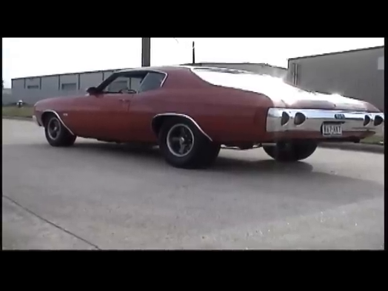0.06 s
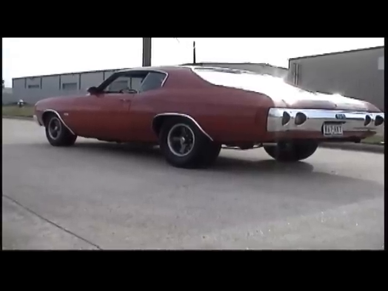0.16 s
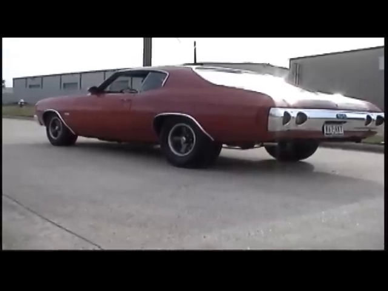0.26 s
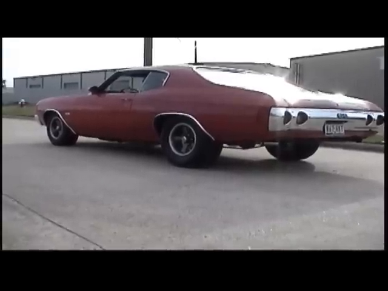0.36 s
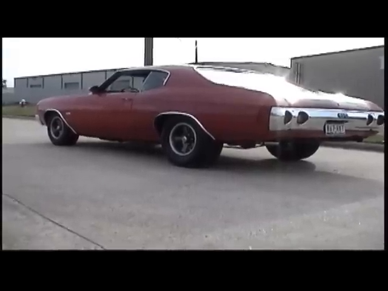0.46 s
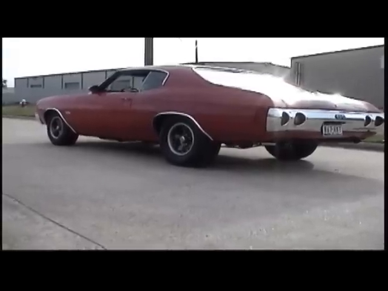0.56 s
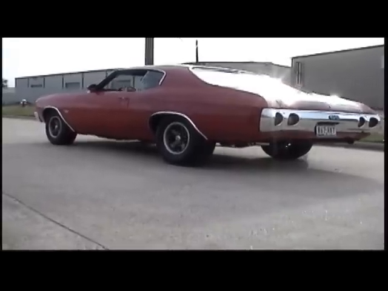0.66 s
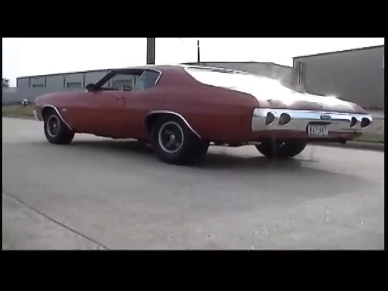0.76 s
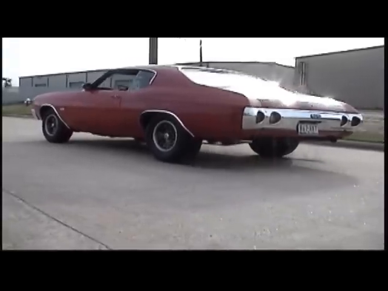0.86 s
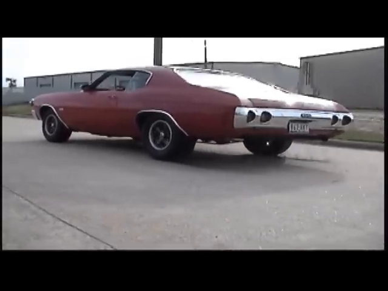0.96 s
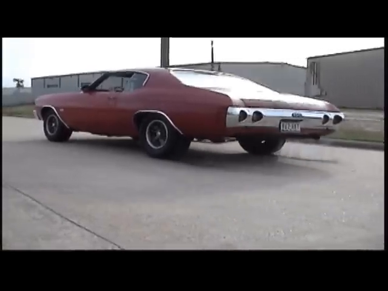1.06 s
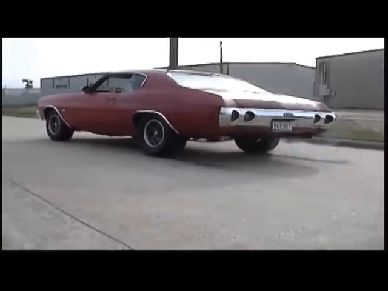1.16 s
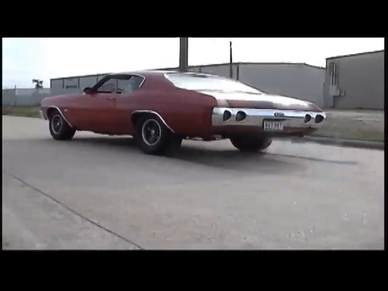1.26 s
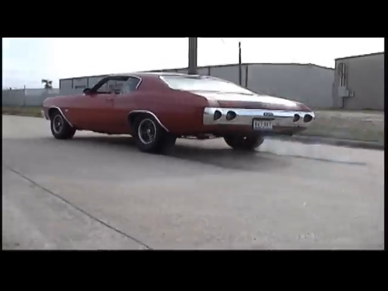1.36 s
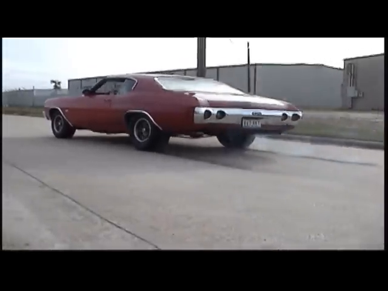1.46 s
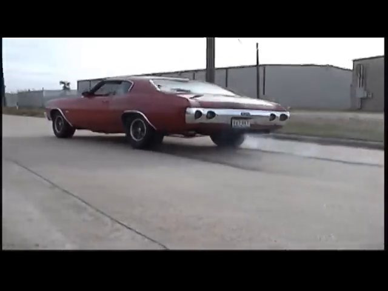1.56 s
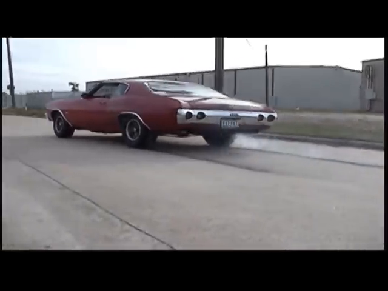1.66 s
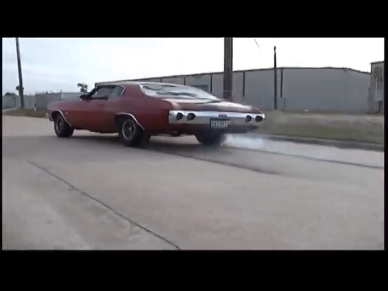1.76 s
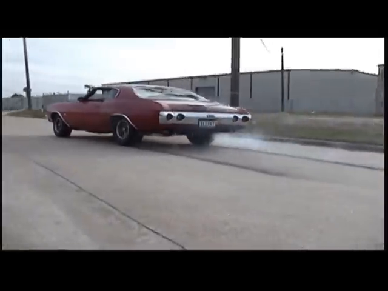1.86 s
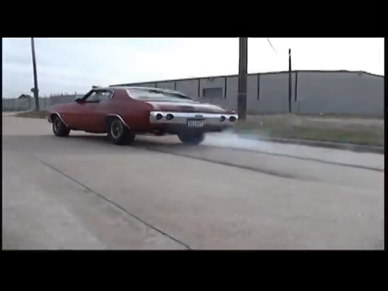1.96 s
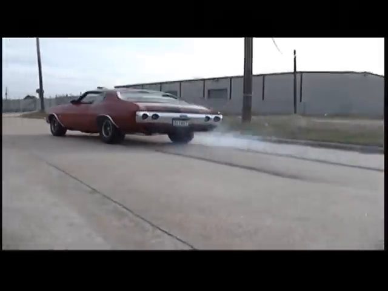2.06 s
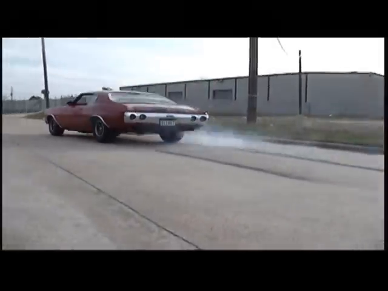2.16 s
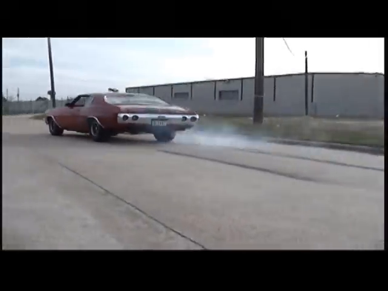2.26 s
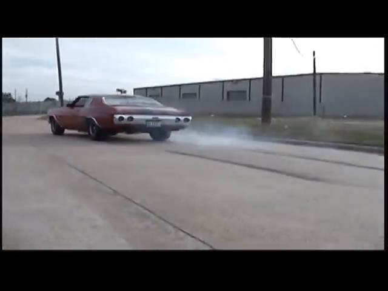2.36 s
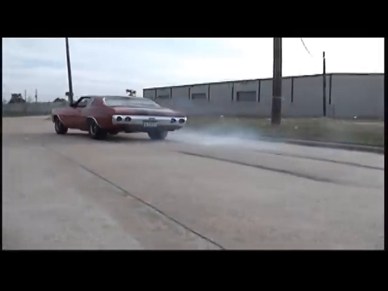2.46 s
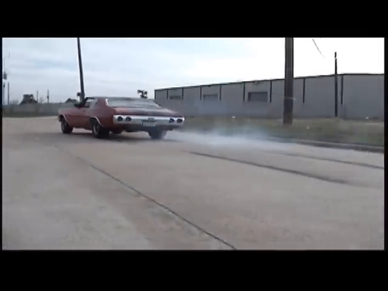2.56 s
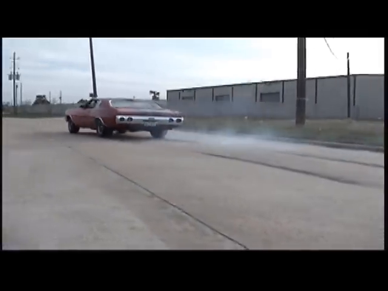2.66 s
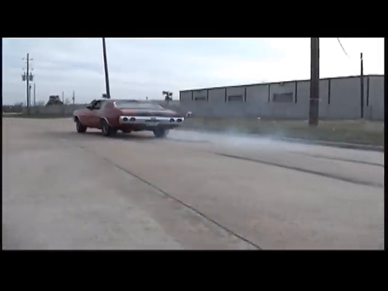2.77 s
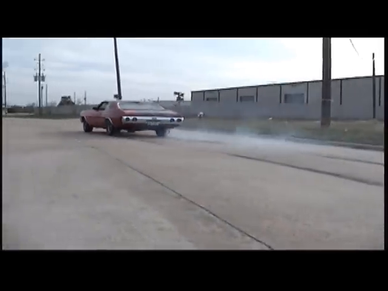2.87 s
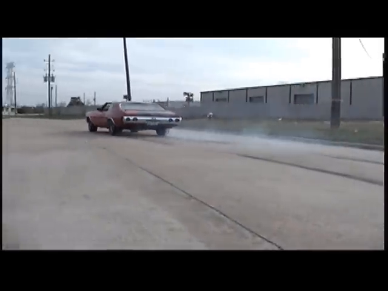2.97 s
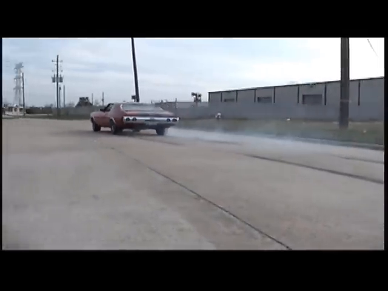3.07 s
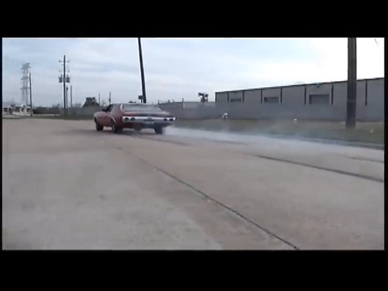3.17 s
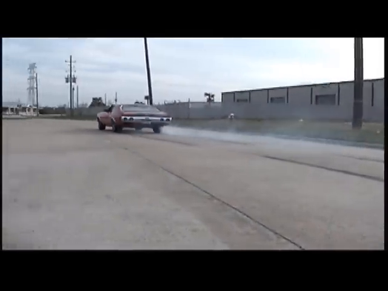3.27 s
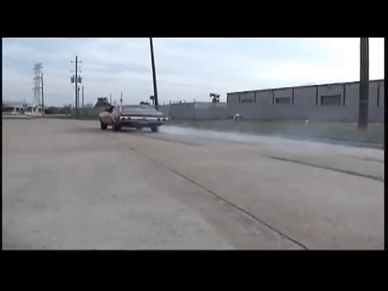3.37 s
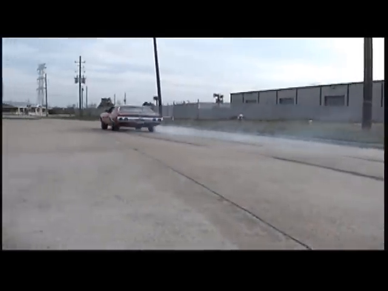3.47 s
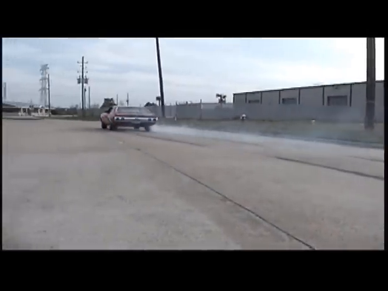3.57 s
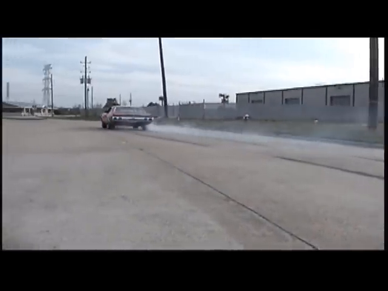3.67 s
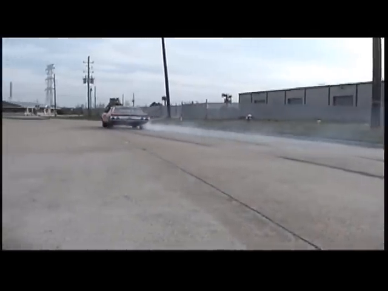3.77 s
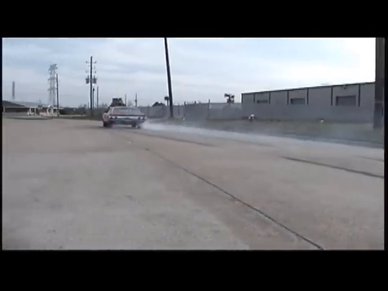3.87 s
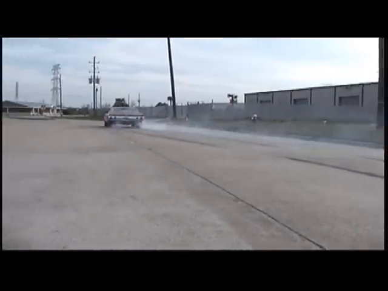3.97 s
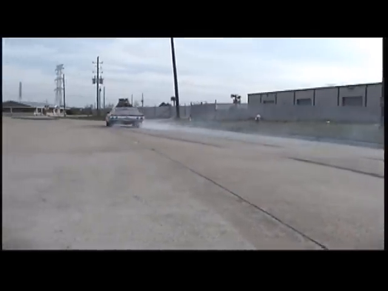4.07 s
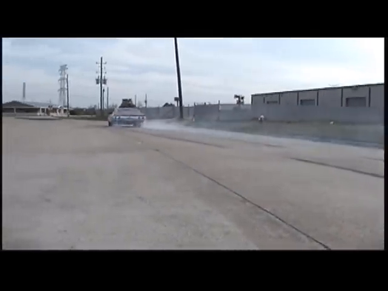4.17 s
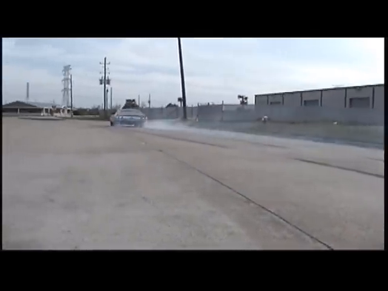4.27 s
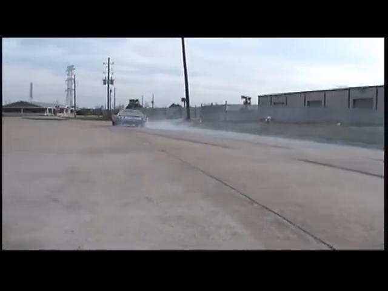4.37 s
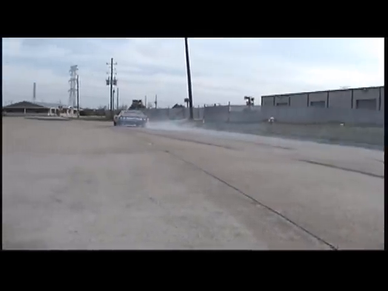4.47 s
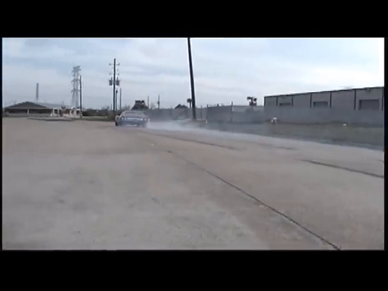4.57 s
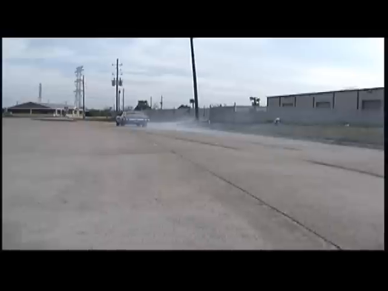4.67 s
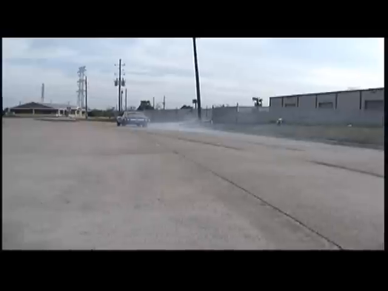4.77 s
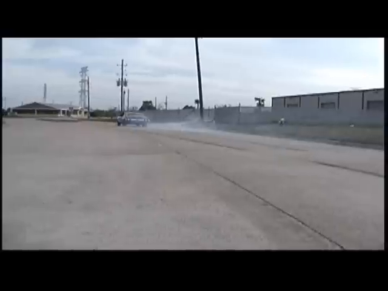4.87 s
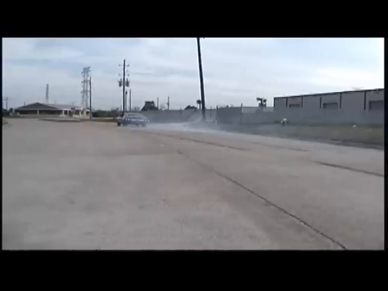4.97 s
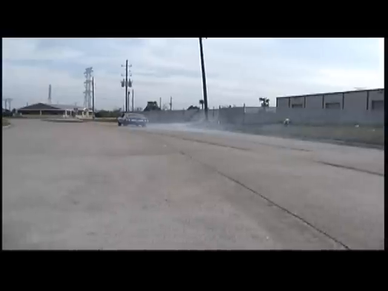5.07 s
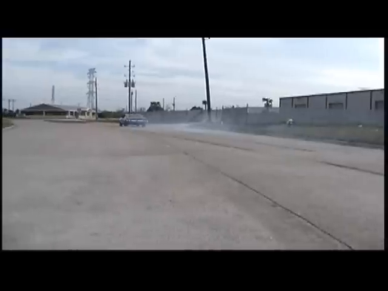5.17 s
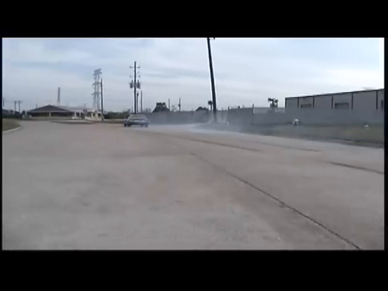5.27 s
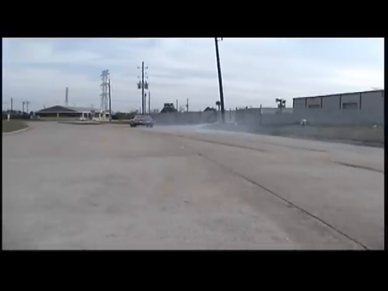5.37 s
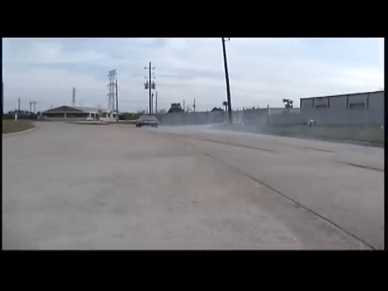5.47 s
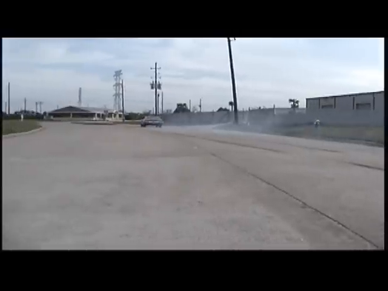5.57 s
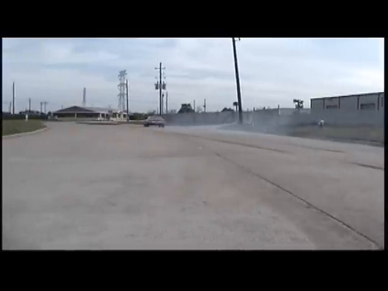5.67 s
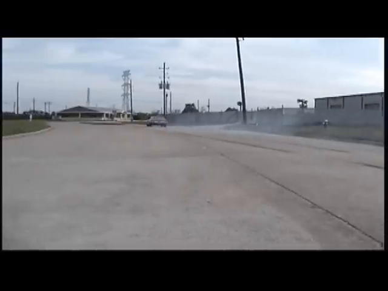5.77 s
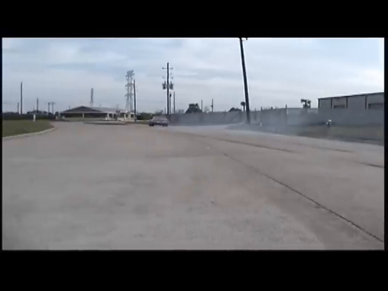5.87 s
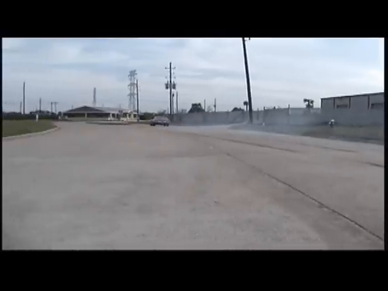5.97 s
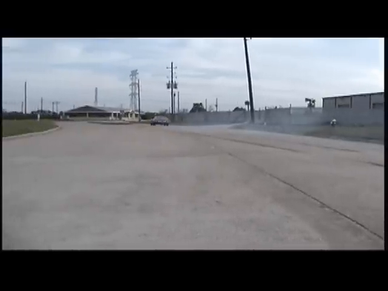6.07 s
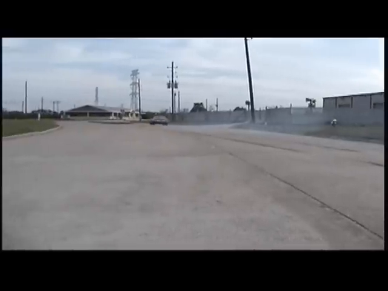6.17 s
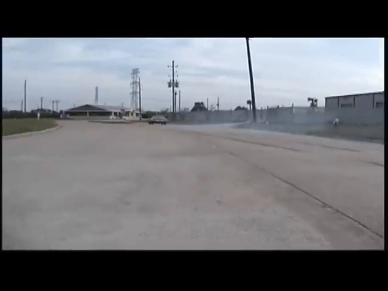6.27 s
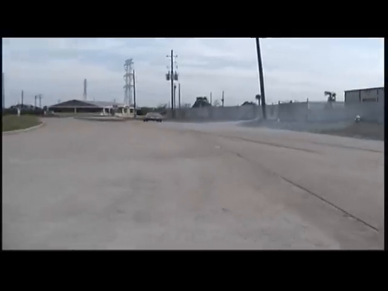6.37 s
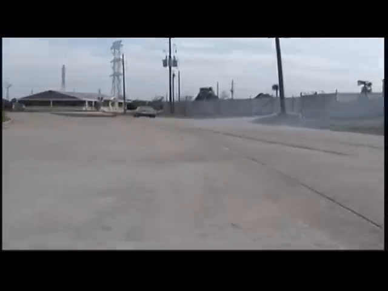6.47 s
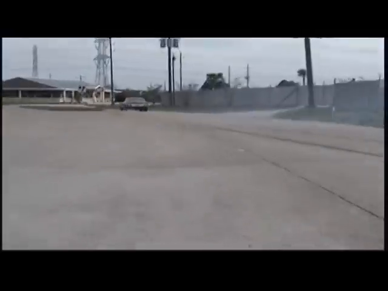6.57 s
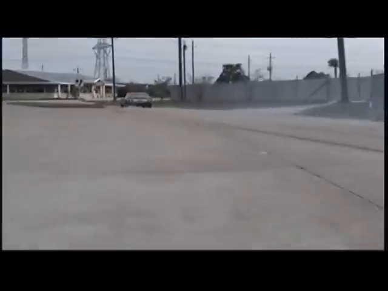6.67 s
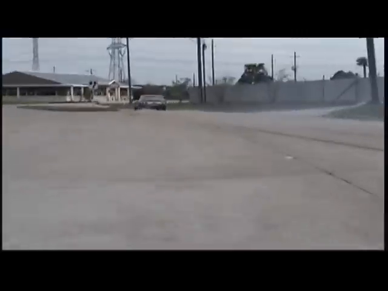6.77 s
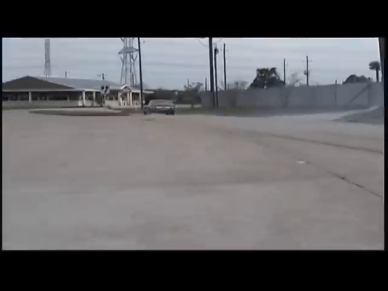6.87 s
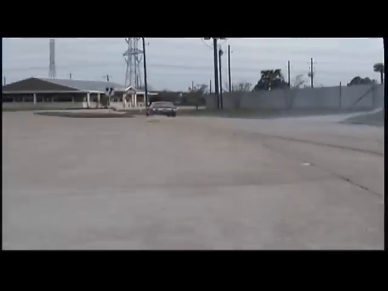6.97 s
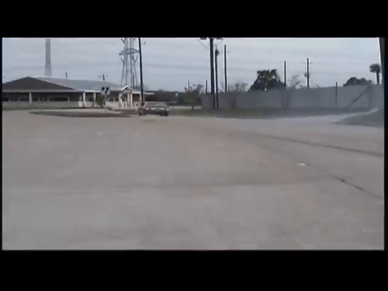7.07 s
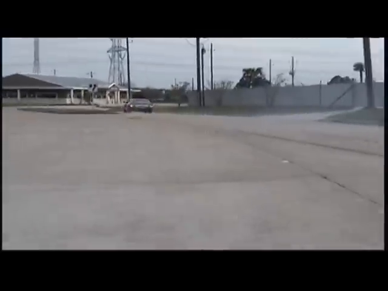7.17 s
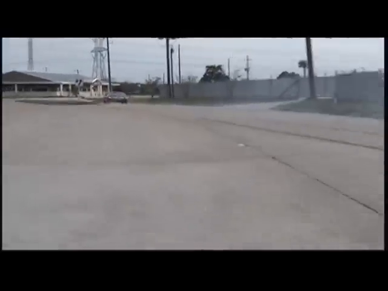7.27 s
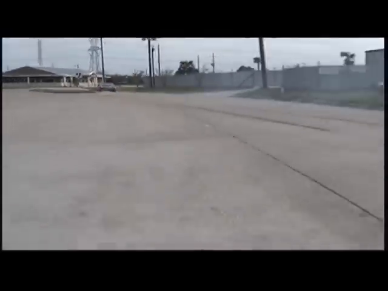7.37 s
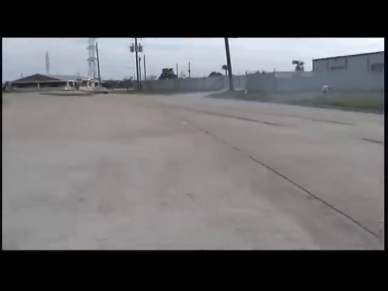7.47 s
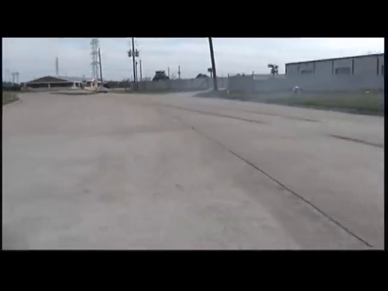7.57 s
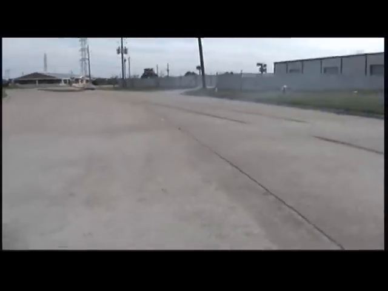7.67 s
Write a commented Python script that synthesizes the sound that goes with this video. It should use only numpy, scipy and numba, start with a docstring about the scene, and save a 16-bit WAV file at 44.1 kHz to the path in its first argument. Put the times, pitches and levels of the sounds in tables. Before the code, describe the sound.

Outdoors on a concrete lot, a V8 burbles and pops right beside a handheld camcorder. It roars, the rear tyres break into a wavering squeal, and revs climb. Two quick gear shifts each briefly stop the squeal before it resumes. The car recedes, duller and quieter, with faint echoes from metal sheds; wind buffets the microphone at the end.

```python
"""A V8 burbles and barks close by, then its rear tyres squeal through three gears as it drives off.
Eight firings a cycle excite the resonances of two exhaust pipes; puffs of noise give gas hiss, and
flickering narrow noise gives rasp. Both tyres stick and slip, a wavering tone with overtones over scrub
noise; sheds echo the car. Wind and a low rumble are coloured noise; a tape camcorder adds head-drum whine,
hiss and casing taps, and its input overloads at the loudest moments."""
import sys
import numpy as np
from scipy import signal
from scipy.fft import rfft, irfft, next_fast_len
from scipy.io import wavfile
from scipy.ndimage import uniform_filter1d
from numba import njit

SR = 44100
rng = np.random.default_rng(int(sys.argv[2]) if len(sys.argv) > 2 else 0)


def wav_out(sig):
    """Save sig, one row per channel (or a flat mono array), as 16-bit PCM at SR to the path in sys.argv[1]."""
    wavfile.write(sys.argv[1], SR, np.round(np.clip(np.atleast_2d(sig).T, -1, 1) * 32767).astype(np.int16))


N = 340222
TIME_S = np.arange(N) / SR


def undb(db):
    """Amplitude gain is ten to the power of the level in dB over 20."""
    return 10 ** (np.asarray(db) / 20)


def unit(x):
    """Normalisation: a signal divided by its root mean square has rms 1."""
    return x / np.sqrt(np.mean(x ** 2))


def curves(table):
    """Linear interpolation turns each column after t/s into a curve, sample by sample."""
    s, *columns = np.transpose(table)
    return [np.interp(TIME_S, s, column) for column in columns]


def geared(tables, fade_s=0.014):
    """Piecewise curves: tables joined in time, and a gate that is open while one of them runs."""
    gate = 0
    for table in tables:
        start_s, end_s = table[0][0], table[-1][0]
        gate = gate + np.clip(np.minimum(TIME_S - start_s, end_s - TIME_S) / fade_s, 0, 1)
    return curves(np.vstack(tables)) + [gate]


def colour(points):
    """Spectral shaping: white noise weighted along (f/Hz, density level/dB) points, scaled to rms 1."""
    hz, db = np.transpose(points)
    size = next_fast_len(N)
    bin_hz = np.arange(1, size // 2 + 2) * SR / size
    gain = undb(np.interp(np.log(bin_hz), np.log(hz), db))
    return unit(irfft(rfft(rng.standard_normal(size)) * gain, size)[:N])


def walk(rate):
    """Low-rate random modulation: levels held for 1 / rate s and slewed twice; rms 1."""
    hold = max(int(SR / rate), 1)
    steps = np.repeat(rng.standard_normal(N // hold + 1), hold)
    return unit(uniform_filter1d(uniform_filter1d(steps, hold), hold)[:N])


@njit
def svf(x, hz, width):
    """State-variable filter: two integrators in a loop, with a moving centre; band and low outputs."""
    band, low = np.empty(len(x)), np.empty(len(x))
    band_state, low_state = 0., 0.
    for i in range(len(x)):
        g = np.tan(np.pi * hz[i] / SR)
        damping = width[i] / hz[i]
        v = (band_state + g * (x[i] - low_state)) / (1 + g * (g + damping))
        band[i] = damping * v
        low[i] = low_state + g * v
        band_state = 2 * v - band_state
        low_state = low_state + 2 * g * v
    return band, low


def ring(x, hz, width_hz):
    """Resonance: a damped mode of fixed frequency passes the band around it."""
    return svf(x, np.full(N, 1. * hz), np.full(N, 1. * width_hz))[0]


def steady(x):
    """Gain control: the level is held at rms 1 over a fifth of a second."""
    return x / np.sqrt(uniform_filter1d(x ** 2, size=8192) + 1e-12)


def engine(cycle_hz, gas_db, rasp_db, boom_db, rough):
    """Source and resonator: each firing kicks the pipe of its bank and lets out a puff of gas."""
    # in firing order: bank, level/dB, lag through its branch of the manifold/s
    cylinders = [(0, 0, 0), (1, -.5, .0006), (1, -4, -.0004), (0, -5, .0008), (1, -9, 0), (0, -9, -.0006),
                 (0, -3, .0004), (1, -1.5, -.0008)]
    bank_lag_s, bank_db = .0007, -5  # the far pipe is heard later and softer
    # share of the unevenness between cylinders, even while held on the brake, lumpy under load: t/s, share
    lump_share = [(0, 0.66), (.45, 0.65), (.6, 0.95), (4.5, 0.9), (5.4, 0.9), (7.71, 1.1)]
    # modes of the pipe: f/Hz, width/Hz, level/dB
    pipe_modes = [(99, 21, -24.5), (150, 32, 4), (263, 36, 2), (307, 37, 4), (398, 28, 4), (538, 58, 1),
                  (627, 13.3, 2), (860, 320, -18.5)]
    # its colour shifts with load and as the car turns away: t/s, then change of level/dB of each mode
    pipe_colour = [(0, -3, 0, 17, -5, 6, 9, -6, -16), (.12, -6, 0, 18, 6, 11, 11, 9, -12),
                   (.25, 3, 0, 18.5, 20, 9, 6, 8, -12), (.4, -8, 0, 15, 4, 19, -7, 9, -10),
                   (.5, -7, 0, 8, -6, 5.5, 1, 6, -4), (1, 12, 0, 0, -2, -0.5, 2, -7, 10),
                   (1.9, 2, 0, -25, -4.5, -7, -0.5, -1, 5), (1.95, 5, 0.00095, 3, -1, 6, -5, -2, 4),
                   (2.05, 24, 0.0011, 8, 10, 5, 9, 12, 7), (2.35, 10, 0.007, -14, 0, -8, -11, 5, 10),
                   (2.6, 4, 0.00068, 0.5, -11, 0, -8.5, 0, 1), (3.1, 2, 0, 0.5, -5, -5, -2, -2, -1),
                   (3.5, -3, 0.0047, 1.5, 8.5, -5, 10, 6, -5), (4.05, 4, 0, -4, 2, -19, 5, -2, 2),
                   (4.12, 13, 0.011, -3.5, 0, -8, -5, 5, -6), (4.4, 18, 0, 5.5, -2.5, -4.5, -2, 3.5, -4),
                   (4.6, 5, 0.0000063, -2, -2.5, 1, 4, -7, -3), (5.5, -5, 0.0062, -5, 0, -10, -8, 0, -4),
                   (6.6, 12.5, 0, 12, 12, 4, 13.5, 5, -7)]
    # a mode near 206 Hz thrums at the start and again from 4.7 s: t/s, level re the pipe modes/dB
    thrum_level, thrum_hz, thrum_width_hz = [(0, -11), (2, -23.5), (4.3, -22), (4.7, -8.5), (5.5, -11.5),
                                             (6.6, -5)], 206.3, 33
    # a low mode near 105 Hz drones when the throttle shuts: t/s, level re the pipe modes/dB
    drone_level, drone_hz, drone_width_hz = [(0, -21), (1.92, -22), (2, -5.5), (2.3, -8), (2.45, -23),
                                             (3.4, -20), (4.05, -11.5), (4.15, -3.5), (4.4, -9), (4.6, -16),
                                             (6.6, -25)], 105, 31
    # noise spectra of the rough firings and of the hissing gas: f/Hz, density level/dB
    rumble_spectrum, gas_spectrum = [(40, -42), (130, -10.5), (600, 10.5), (1000, -23), (2000, -35)], [(500, -28), (1000, 1.5), (1600, -3.5), (2300, -3),
                                                     (3500, -14), (7000, -19), (11000, -16), (15500, -38)]
    rasp_hz = 2300

    count = .99 + 8 * np.cumsum(cycle_hz) / SR
    firing = count.astype(int)
    at = np.flatnonzero(np.diff(firing)) + 1
    bank, db, branch_s = np.transpose(cylinders)[:, firing % 8]
    late_chance, size_chance = rng.standard_normal((N // 64, 2))[:len(at)].T
    # the two banks fire unevenly, which gives the burble below the firing rate
    lump = np.clip(curves(lump_share)[0][at], 0, 1)
    late_s = lump * (bank[at] * bank_lag_s + branch_s[at]) + .001 * rough[at] * late_chance
    size = undb(lump * (db[at] + bank_db * bank[at]) + 6 * rough[at] * size_chance)
    kicks = np.zeros(N)
    np.add.at(kicks, np.clip(at + (late_s * SR).astype(int), 0, N - 1), size)
    # the valve opens gradually, so each kick is a soft push
    kicks = signal.sosfilt(signal.butter(4, 1100, fs=SR, output="sos"), kicks)

    def single_mode(hz, width_hz):
        """Two equal resonances in cascade select one mode narrowly."""
        return steady(ring(ring(kicks, hz, width_hz), hz, width_hz))

    modes = 0
    for (hz, width_hz, mode_db), shift_db in zip(pipe_modes, curves(pipe_colour)):
        modes = modes + undb(mode_db + shift_db) * ring(kicks, hz, width_hz)
    pipe = steady(modes)
    pipe = pipe + undb(boom_db) * single_mode(165.0, 40)
    pipe = pipe + undb(curves(thrum_level)[0]) * single_mode(thrum_hz, thrum_width_hz)
    pipe = pipe + undb(curves(drone_level)[0]) * single_mode(drone_hz, drone_width_hz)

    # each puff dies away in 4 ms over a constant flow
    puff = unit(signal.lfilter([1], [1, -np.exp(-1 / (.004 * SR))], kicks) + 2.5)
    gas = puff * (1.1 * rough * colour(rumble_spectrum) + undb(gas_db) * colour(gas_spectrum))
    flicker = undb(3.7 * walk(62))
    rasp = unit(flicker * ring(ring(rng.standard_normal(N), rasp_hz, 170), rasp_hz, 300))
    return np.sqrt(1 - rough ** 2) * pipe + gas + undb(rasp_db) * rasp


def air():
    """Turbulence: wind buffets the ports and rushes brighter as it grows, beside a low rumble."""
    # wind presses the two ports of the microphone in opposite senses: t/s, level/dB
    wind_level = [(0, -40), (.1, -34), (.22, -42), (.3, -69), (3.3, -63), (3.7, -53), (4.15, -41),
                  (4.3, -63), (4.6, -56), (4.85, -40.5), (5.15, -36), (5.4, -35.5), (5.5, -41),
                  (6.05, -44.5), (6.3, -41), (6.42, -39.5), (6.53, -46), (6.66, -32.5), (6.72, -44),
                  (6.79, -35.5), (6.84, -44), (6.88, -38.5), (7.05, -36.5), (7.15, -34.5), (7.3, -34.5),
                  (7.45, -31), (7.52, -35.5), (7.6, -34.5), (7.65, -41), (7.71, -37)]
    # spectra of buffet and rush: f/Hz, density level/dB
    buffet_spectrum, rush_spectrum = [(25, 2.5), (110, 2), (250, 1), (350, -11.5), (600, -20.5),
                                      (1500, -53)], [(200, -9.5), (350, 2), (600, -10.5), (1840, -34),
                                                      (3440, -46), (8000, -67)]
    # rush re buffet at gust level, its extra dB per dB of wind, and that gust level
    rush_at_gust_db, rush_growth, gust_db = -2.5, 1, -35.5
    shared_db = -13.5  # the part of the wind alike at both ports
    # a steady rumble, then gusts felt alike at both ports once the car has gone:
    # t/s, level before rumble_gain_db is added/dB
    gust_level, rumble_gain_db = [(6.72, -64), (7.028, -58), (7.038, -51), (7.052, -58), (7.11, -63),
                                  (7.14, -51.5), (7.23, -60), (7.312, -55), (7.444, -51.5), (7.566, -57),
                                  (7.594, -54), (7.638, -59), (7.686, -61), (7.71, -56)], 12
    # f/Hz, density level/dB
    rumble_spectrum = [(12, -7), (25, 2), (90, 3), (245, 10.5), (534, -0.5), (789, -5.5), (1460, -12),
                       (2500, -29.5), (3450, -40.5), (15500, -72.5)]

    db = curves(wind_level)[0]
    rush_db = rush_at_gust_db + rush_growth * (db - gust_db)

    def wind():
        """Gusts are noise of randomly varying intensity."""
        buffet = undb(5.1 * walk(24)) * colour(buffet_spectrum)
        rush = undb(rush_db + 2.1 * walk(30)) * colour(rush_spectrum)
        return undb(db) * (buffet + rush)

    rumble_db = rumble_gain_db + curves(gust_level)[0]
    mid = undb(rumble_db) * colour(rumble_spectrum) + undb(shared_db) * wind()
    # a softer, independent part differs between the ports
    side = undb(rumble_db - 6.5) * colour(rumble_spectrum) + wind()
    return np.array([mid + side, mid - side])


def camcorder():
    """Rotation yields harmonics: the head drum whines steadily, with tape hiss and taps on the casing."""
    # harmonics of the head drum: multiple of drum_hz, level/dB
    whine_harmonics, drum_hz = [(8, -69), (9, -72), (15, -77), (17, -77), (19, -79), (22, -86), (24, -85),
                                (25, -83), (26, -78), (27, -88), (28, -83), (30, -85), (32, -82), (34, -86),
                                (36, -87), (37, -90), (39, -87), (40, -87), (46, -89), (49, -91), (51, -90),
                                (54, -88), (56, -91), (58, -91), (64, -89), (69, -95), (72, -94), (80, -92),
                                (105, -101)], 149.85
    # tape hiss: f/Hz, density level/dB
    hiss_spectrum, hiss_db = [(1500, -19), (3000, 0.5), (4400, -6.5), (8400, -1.5), (12000, -4),
                              (15500, -16.5)], -70.5
    # a finger taps the casing: t/s, envelope level/dB
    finger_taps = [(6.8494, -37), (7.5343, -64)]
    tap_spectrum = [(810, 2), (1500, 6), (2510, 9), (7010, -6), (13010, -18)]  # f/Hz, density level/dB

    whine = 0
    for multiple, db in whine_harmonics:
        cycles = multiple * drum_hz * TIME_S + .1 * rng.standard_normal()
        whine = whine + np.sqrt(2) * undb(db) * np.sin(2 * np.pi * cycles)
    taps = sum(undb(db) * (TIME_S > s) * np.exp(-np.abs(TIME_S - s) / 0.001) for s, db in finger_taps)
    return whine + undb(hiss_db) * colour(hiss_spectrum) + taps * colour(tap_spectrum)


def pops():
    """Impulsive combustion: unburnt gas lights in the pipe, a short ringing bark."""
    # t/s, envelope level before pop_db is added/dB
    barks = [(0.034, -27), (0.182, -26.5), (2.266, -26), (2.294, -23.5), (4.428, -42), (4.462, -30),
             (5.266, -38), (6.176, -39)]
    pop_hz, pop_width_hz, decay_s, pop_db = 580, 200, .018, -3
    shape = 0
    for s, db in barks:
        shape = shape + undb(db + pop_db) * (TIME_S > s) * np.exp(-np.abs(TIME_S - s) / decay_s)
    return shape * unit(ring(rng.standard_normal(N), pop_hz, pop_width_hz))


def sheds(x):
    """Diffuse reflection: metal sheds return a dull, scattered echo, different at each side."""
    sheds_db, t60_s, gap_s, dull_pole = -29, 0.45, 0.045, 0.89
    t = np.arange(SR) / SR
    tail = rng.standard_normal((2, SR)) * 1000. ** (-t / t60_s) * (t > gap_s)
    tail = signal.lfilter([1], [1, -dull_pole], tail)
    tail = signal.sosfilt(signal.butter(2, 8000, fs=SR, output="sos"), tail)
    tail = tail / np.sqrt(np.sum(tail ** 2, axis=1, keepdims=True))
    return undb(sheds_db) * signal.fftconvolve(x[None], tail, axes=1)[:, :N]


def squeal(hz, db, over_db, waver, flutter_db, chorus_db):
    """Stick-slip oscillation: a wavering tone with overtones, and a blur from tread blocks out of step."""
    # multiple of the slip rate, level before over_db is added/dB
    overtone_levels = [(2, -1.5), (3, -14.5), (4, -35), (5, -58.5)]
    wavering_hz = hz * (1 + waver * walk(55) + .7 * waver * walk(220))
    phase = 2 * np.pi * np.cumsum(wavering_hz) / SR
    overtones = 0
    for k, overtone_db in overtone_levels:
        level = undb(overtone_db + 2.5 * walk(90))
        overtones = overtones + level * np.sin(k * phase + .09 * k * walk(500))
    flutter = undb(flutter_db * walk(70))
    tone = np.sqrt(2) * flutter * (np.sin(phase) + undb(over_db) * overtones)

    def blur(k):
        """Narrow-band noise follows a multiple of the slip rate."""
        centre_hz, width_hz = k * hz, 0.13 * k * hz
        once = svf(rng.standard_normal(N), centre_hz, width_hz)[0]
        return unit(svf(once, centre_hz, width_hz)[0])

    first, second = blur(1), blur(2)
    return undb(db) * (tone + undb(chorus_db) * (first + undb(over_db) * second))


def tyres():
    """Friction: two tyres squeal over the scrub of rubber on concrete, hushed whenever they bite."""
    # one table a gear: t/s, slip rate f/Hz of the near tyre, squeal level/dB, overtones re squeal/dB
    slip = [
        [(.59, 1375, -58, -13), (.615, 1325, -25, -2), (.627, 1191, -16, -20), (.64, 1143, -14.5, -4.5),
         (.675, 1131, -10.5, -9), (.708, 1129, -12.5, -7), (.73, 1175, -16.5, -3.5), (.8, 1157, -19, 1),
         (1.1, 1223, -17, -5), (1.3, 1227, -17.5, -1), (1.55, 1243, -20.5, 3.5), (1.8, 1236, -22.5, 1.5),
         (1.91, 1234, -21, 3), (1.96, 1259, -20, -2.5), (2, 1302, -35, -17), (2.05, 1241, -74, -16)],
        [(2.36, 1296, -42, -37), (2.41, 1302, -25, -4), (2.435, 1143, -20, 3), (2.49, 1169, -21.5, -3.5),
         (2.52, 1242, -21.5, 2.5), (3.2, 1221, -20, -6.5), (3.43, 1236, -20.5, -7), (3.52, 1265, -22, -13.5),
         (3.61, 1162, -24, -5.5), (3.68, 1248, -22.5, -9), (3.72, 1205, -23.5, -6), (3.91, 1203, -24.5, -5),
         (3.944, 1281, -21.5, -7.5), (3.956, 1415, -26.5, -29), (3.97, 1324, -26.5, -6.5),
         (4.005, 1174, -26.5, -17), (4.02, 1337, -31, -13), (4.042, 1290, -24, -11), (4.056, 1355, -26.5, -8),
         (4.084, 1180, -28.5, -12), (4.1, 1300, -37.5, -6), (4.13, 1260, -51, -10)],
        [(4.49, 1200, -68, -1), (4.53, 1231, -31, -14.5), (4.61, 1172, -24.5, -8.5), (4.64, 1156, -27, 4.5),
         (4.67, 1227, -21.5, -7.5), (4.75, 1252, -26.5, -3.5), (4.806, 1190, -26, -5.5),
         (4.876, 1218, -25.5, -7), (4.9, 1153, -24, -11.5), (4.97, 1157, -24, -7.5), (5.054, 1194, -25, -9.5),
         (5.14, 1236, -23.5, -6.5), (5.175, 1205, -29.5, -7), (5.245, 1252, -23.5, -30),
         (5.272, 1216, -38.5, -7), (5.29, 1260, -65, -17)],
    ]
    # both sink under the near squeal as the car leaves:
    # t/s, far tyre level re near/dB, scrub level re near/dB, rms depth of the warble/Hz
    tyre_mix = [(.62, -4, -30, 5), (.65, -25, -20, 5.3), (.75, -4, -7, 18), (1.4, -1, -6.5, 30),
                (1.65, -3, -2, 22.9), (1.9, 0, -10, 29.4), (2.4, -3, -8, 38), (3.1, -6, -12.5, 33),
                (3.3, -5.5, -13.5, 38), (3.5, -13, -13, 36), (4, -10.5, -14.5, 29.4), (4.6, -24, -18, 17.4),
                (4.8, -8.5, -21, 19.5), (5.06, -8.5, -22, 18.7), (5.12, -16, -19.5, 16),
                (5.2, -18, -22, 12)]
    # the tyres bite for a moment and the squeal breaks off: t/s, length/s, drop/dB
    grips = [(3.954, 0.011, 12), (4.006, 0.026, 10), (4.064, 0.032, 6.5), (4.942, 0.036, 17),
             (5.017, 0.025, 7), (5.107, 0.034, 6.5), (5.204, 0.04, 23)]
    # the far tyre flicks upward at random; the widest flicks: t/s, rise/Hz
    flicks, flick_s = [(0.729, 69.5), (0.889, 80.93), (1.049, 60.04), (1.168, 49.8), (1.53, 141.3),
                       (1.73, 59.6), (1.84, 89.55), (2.47, 49.66), (2.685, 151.9), (2.791, 89.73),
                       (3.02, 79.33), (3.216, 144)], 0.027
    far_slip_hz, flick_hz, flick_rate = 1321, 24.92, 20
    near_drift, far_dull_db = 0.003013, -9  # the latter for the far tyre's overtones
    # f/Hz, density level/dB
    scrub_spectrum = [(310, 1.5), (910, 6), (1810, 1), (3510, -3.5), (6010, -15.5), (9010, -11.5),
                      (12510, -20), (15510, -28)]
    arch_hz, arch_width_hz, arch_db = 1977, 42, -24.5  # the wheel arch rings with the scrub; re squeal

    hz, db, over_db, gate = geared(slip)
    far_db, scrub_db, warble_hz = curves(tyre_mix)

    def warble():
        """Frequency modulation: the tyre carcass shakes and the squeal warbles with it."""
        return warble_hz * steady(ring(rng.standard_normal(N), 59.7, 20.7))

    far_hz = far_slip_hz + flick_hz * np.clip(walk(flick_rate), 0, None)
    far_hz = far_hz + sum(rise * np.exp(-((TIME_S - s) / flick_s) ** 2) for s, rise in flicks)
    near_hz = hz * (1 + near_drift * walk(25)) + warble()
    near_waver = .005 * np.clip(warble_hz / 20, .3, 1)
    near = squeal(near_hz, db, over_db, waver=near_waver, flutter_db=1.6, chorus_db=-12)
    far = squeal(far_hz + warble(), db + far_db, over_db + far_dull_db,
                 waver=.014, flutter_db=4, chorus_db=-4)
    scrub = undb(db + scrub_db + 1.5 * walk(40)) * colour(scrub_spectrum)
    scrub = scrub + undb(db + arch_db) * unit(ring(rng.standard_normal(N), arch_hz, arch_width_hz))
    bite_db = sum(drop * np.exp(-((TIME_S - s) / (length / 2)) ** 6) for s, length, drop in grips)
    return gate * (undb(-bite_db) * (near + far) + undb(-.6 * bite_db) * scrub)


def scene():
    """Propagation: the car speeds away and dulls with distance as air takes its treble."""
    # revs climb in each gear and fall at the shifts: t/s, engine cycle rate f/Hz, roughness 0-1
    revs = [(0, 16.2, .22), (.25, 16.6, .17), (.45, 18, .2), (.65, 23.5, .45), (1, 29.3, .18),
            (1.3, 34.3, .08), (1.6, 38.3, .08), (1.8, 40.2, .08), (1.89, 40.5, .1), (1.93, 38.3, .08),
            (2.1, 34.6, .1), (2.27, 32, .12), (2.34, 34, .4), (2.41, 34, .35), (2.52, 28.7, .25),
            (2.8, 30.2, .08), (3.1, 31.5, .05), (3.5, 32.9, .03), (4.04, 33.7, .03), (4.1, 32, .05),
            (4.4, 27.2, .1), (4.45, 28.4, .4), (4.52, 28.2, .35), (4.65, 22, .24), (4.8, 20.7, .15),
            (5.35, 17, .1), (5.7, 17.7, .11), (6.65, 19.7, .11), (7, 15, .5), (7.71, 14, .5)]
    # exhaust, up with the throttle, down at each lift and with distance: t/s, level/dB
    exhaust_level = [(0, -28.5), (.46, -32), (.49, -22.5), (.6, -23), (.66, -30.5), (1.3, -27.5),
                     (1.88, -28), (2, -28), (2.255, -27.5), (2.266, -35), (2.285, -31), (2.293, -29),
                     (2.31, -25.5), (2.38, -24), (2.42, -32.5), (3.37, -33), (4.02, -32.5), (4.09, -41.5),
                     (4.422, -45.5), (4.43, -36), (4.455, -36.5), (4.464, -41), (4.48, -37), (4.52, -41),
                     (6.6, -41.5), (6.74, -55.5), (7.71, -63.5)]
    # t/s, then gas hiss, pipe rasp and muffler boom, each level re exhaust/dB
    exhaust_tone = [(0, -16, -14, 0.5), (.08, -12, -9.5, -0.5), (.2, -11.5, -7.5, 1),
                    (.26, -13.5, -21, 4.5), (.45, -10.5, -10.5, 5), (.6, -13.5, -11.5, -45),
                    (1.3, -10, -28, -2.5), (1.85, -43, -2, -35), (2, -10, -16, -7), (2.4, -11.5, -20, -14),
                    (3.5, -11.5, -4, -9), (4, -6.5, -3.5, -22.5), (4.1, -4.5, -20, -3),
                    (4.4, -8, -7.5, 6.5), (4.5, -9.5, -28, -6), (5.4, -11, -21, -13), (6.2, -9.5, -35, -4),
                    (6.55, -5.5, -22, -6.5), (6.75, 0.5, -29, 2), (7.71, -0.5, -30, 2)]
    start_m, rolls_s, accel_m_s2 = 2, 0.11, 8.3
    wet_db_per_doubling = .5  # the echo gains on the direct sound as the car leaves

    cycle_hz, rough = curves(revs)
    exhaust = undb(curves(exhaust_level)[0]) * engine(cycle_hz, *curves(exhaust_tone), rough)
    car = exhaust + tyres() + pops()
    metres = start_m + accel_m_s2 / 2 * np.clip(TIME_S - rolls_s, 0, None) ** 2
    edge_hz = np.clip(46000 / np.sqrt(np.clip(metres, 1, None)), 500, 14000)
    car = svf(car, edge_hz, 1.5 * edge_hz)[1]
    car = svf(car, 1.4 * edge_hz, 2 * edge_hz)[1]
    echo = sheds(car * undb(wet_db_per_doubling * np.log2(metres / start_m)))
    return car + echo + air() + camcorder()


def record(dry):
    """Filtering and saturation: bass cuts around a shared overload, treble fall, stereo spread, top cut."""
    overload, knee = .17, 4
    casing_db, casing_hz, casing_s = -18, 4600, .008
    port_hz, bass_hz, treble_hz, top_hz = 14, 116, 9700, 15660
    balance_db = -.7  # left re right

    bass_cut = signal.butter(1, bass_hz, "high", fs=SR, output="sos")
    deep_cut = signal.butter(1, 45, "high", fs=SR, output="sos")
    treble_fall = signal.butter(2, treble_hz, fs=SR, output="sos")
    x = signal.sosfilt(bass_cut, dry)
    # the mean of the channels overloads both together
    x = x / (1 + np.abs(x.mean(axis=0) / overload) ** knee) ** (1 / knee)
    x = signal.sosfilt(np.vstack([bass_cut, deep_cut, treble_fall]), x)
    # the casing scatters treble unequally to the two ports
    scatter = rng.standard_normal(512) * np.exp(-np.arange(512) / (casing_s * SR))
    treble = ring(ring(x.mean(axis=0), casing_hz, casing_hz), casing_hz, casing_hz)
    side = signal.fftconvolve(treble, scatter / np.linalg.norm(scatter))[:N]
    x = x + undb(casing_db) * side * np.array([[1], [-1]])
    # an all-pass gives the right channel a slight phase lead in the bass
    pole = np.exp(-2 * np.pi * port_hz / SR)
    x = np.array([x[0], signal.lfilter([pole, -1], [1, -pole], x[1])])
    x = x * undb([[balance_db / 2], [-balance_db / 2]])
    return signal.sosfilt(signal.ellip(12, .2, 80, top_hz, fs=SR, output="sos"), x)


dry = scene()
out = record(dry)
wav_out(out)
```